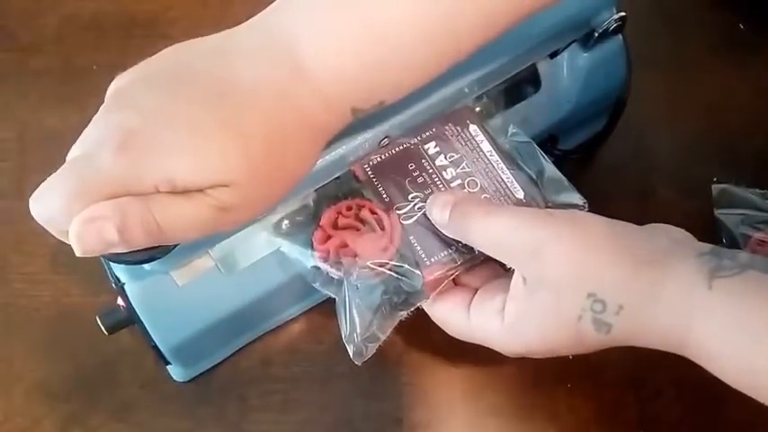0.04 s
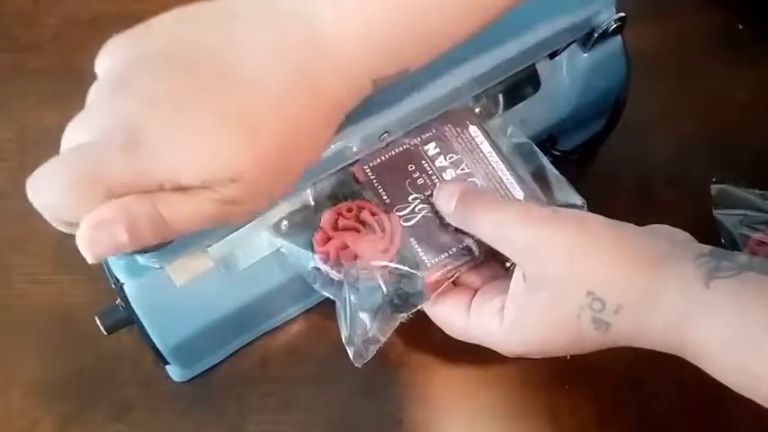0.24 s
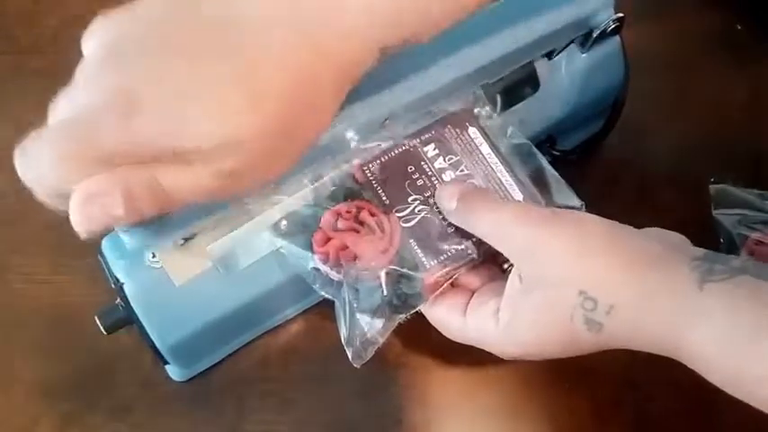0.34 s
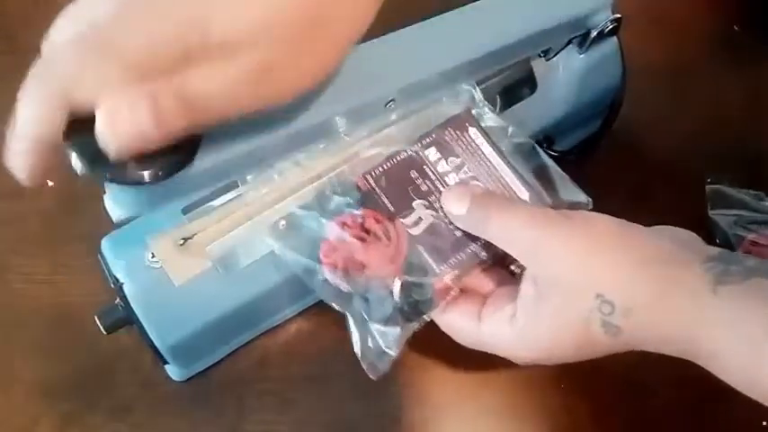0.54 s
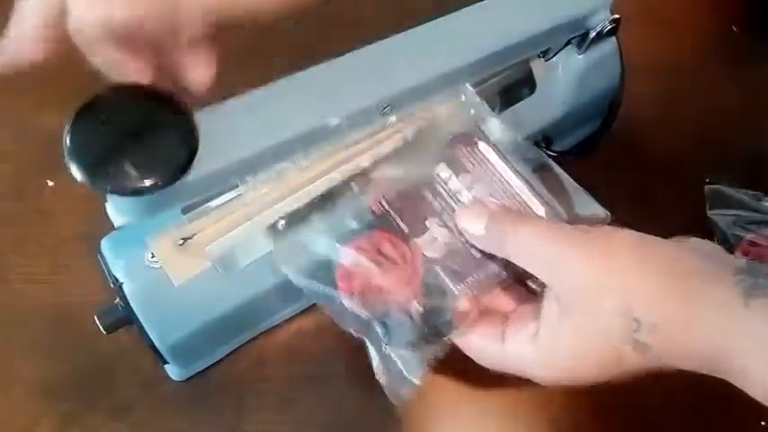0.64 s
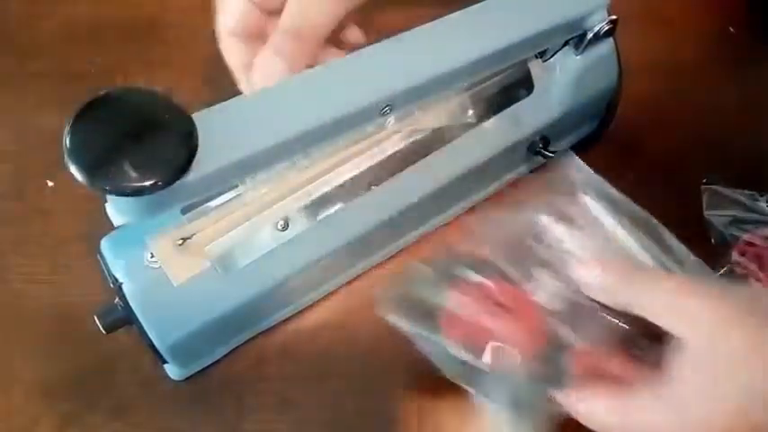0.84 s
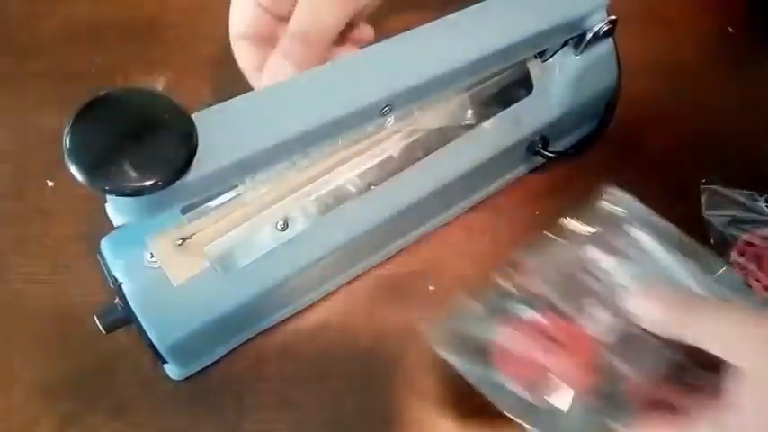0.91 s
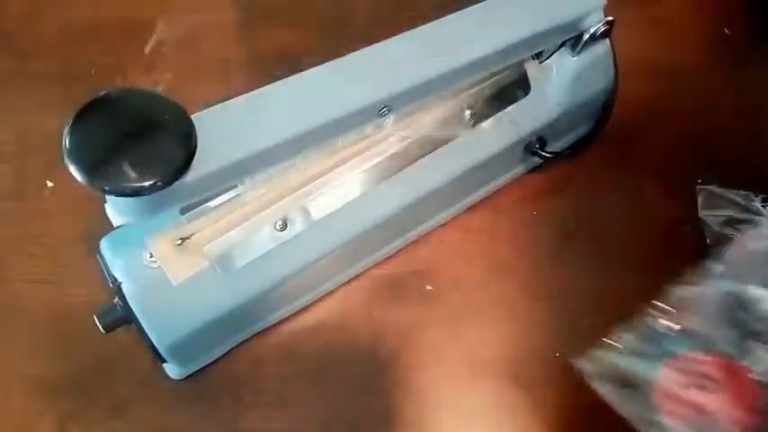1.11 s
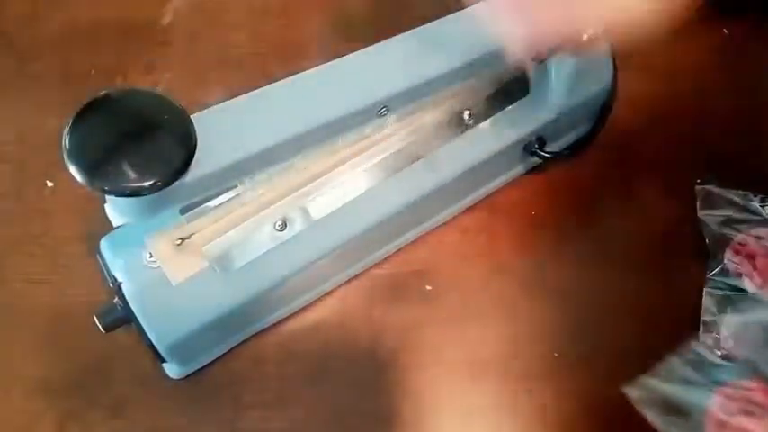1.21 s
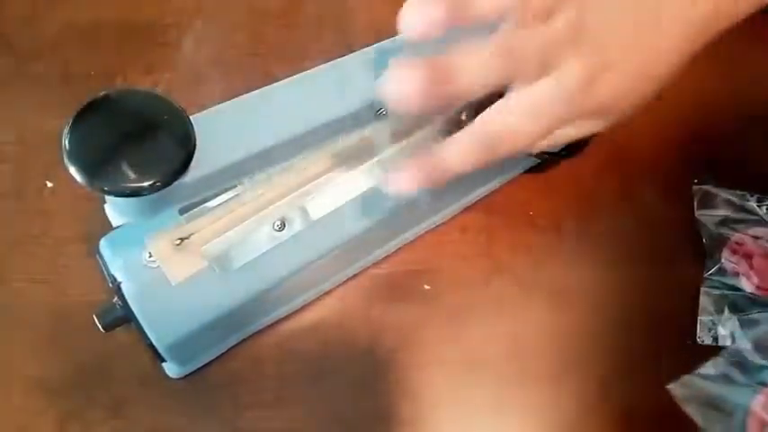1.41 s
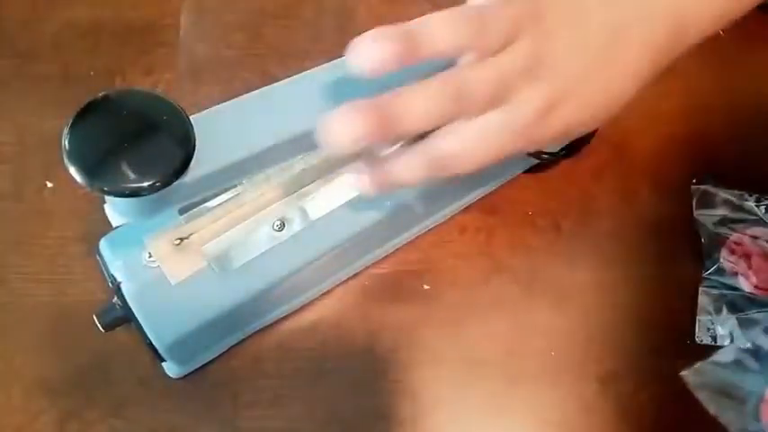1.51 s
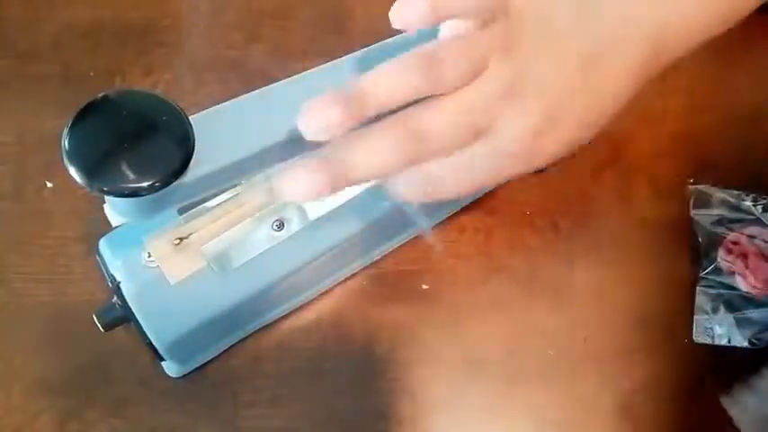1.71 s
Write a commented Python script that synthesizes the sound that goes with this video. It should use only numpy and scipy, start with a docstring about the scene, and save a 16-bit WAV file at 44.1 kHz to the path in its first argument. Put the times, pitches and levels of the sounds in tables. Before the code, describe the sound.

A bench bag sealer's arm springs up with knocks and rattles while a stiff plastic bag crackles.

```python
"""Bag sealer arm and crackling bag

A hand lets go of the arm of a bench bag sealer; the arm springs up, knocks and rattles on a wooden table,
as decaying modes driven by short blows and noise. The other hand pulls out a stiff plastic bag and lays it
aside: single folds are band-passed noise bursts, the fine crinkle is noise gated by random folds.
A small quiet room adds a diffuse tail and a low murmur; a phone close by hears it all."""
import sys
import numpy as np
from scipy import signal
from scipy.fft import rfft, irfft
from scipy.io import wavfile
from scipy.ndimage import uniform_filter1d

SR = 44100
rng = np.random.default_rng(int(sys.argv[2]) if len(sys.argv) > 2 else 0)


def digitize_waveform(pressure):
    """Quantize a signal to 16-bit integers and store it at the path in sys.argv[1].

    Rows of a 2-D input are taken as channels; values are limited to [-1, 1].
    """
    field = np.atleast_2d(pressure).T
    bounded = np.clip(field, -1, 1)
    quanta = np.round(bounded * 32767).astype(np.int16)
    wavfile.write(sys.argv[1], SR, quanta)


def nominal_scale(level):
    """Amplitude ratio for a level in decibels (scalar or array-like)."""
    x = np.asarray(level, float) / 20
    return 10 ** x


N = 77175
T = np.arange(N) / SR  # time in seconds

# Modes of the sealer and the table under it: pitch_hz, relative level_db, t60_s
BODY_MODES = [(138.5, -3, 0.1), (160.8, -4, 0.094), (213.2, -2.5, 0.12), (274, -10, 0.041),
              (296, -10.5, 0.061), (342, -6.5, 0.044), (431.2, 1.5, 0.054), (462.8, 3, 0.062),
              (534, -1.5, 0.043), (671, -5, 0.027), (1064, -16.5, 0.084), (1910, -19, 0.036),
              (2285, -12.5, 0.016), (5300, -17, 0.023), (614, -10.5, 0.05), (752.5, -4, 0.037),
              (987, -11, 0.082), (1203, -5, 0.045), (1341, -21, 0.29), (1427, -3, 0.021), (1724, -5, 0.024),
              (1855, -8, 0.046), (2093, -0.5, 0.025), (2414, -8.5, 0.056), (2797, -6, 0.03),
              (4110, -13.5, 0.033)]
# Centres of the six bands into which each blow is divided: centre_hz
STRIKE_HZ = [150, 450, 760, 1250, 2100, 4100]
# Knocks of the arm, and bumps of the bag on the sealer; the place struck decides what rings:
# start_s, chatter_length_s, then six relative level_db, one for each of STRIKE_HZ
KNOCKS = [(0.2447, 0.0011, -15, -23, -26, -27, -23.5, -64), (.275, 0.012, -36, -59, -39.5, -50, -43, -62),
          (.295, 0.007, -49, -40, -39, -43, -50, -65), (0.3146, 0.0048, -74, -34, -31, -48, -50, -20),
          (0.355, 0.026, -40, -43, -42, -45, -69, -28), (0.422, 0.0021, -52, -36.5, -48.5, -66, -69, -40),
          (0.427, 0.0066, -59, -38.5, -31, -41, -62, -41),
          (0.526, 0.0055, -30.5, -28, -31, -27.5, -37, -36.5), (.536, .012, -52, -25, -50, -31.5, -48, -50),
          (.572, 0.0055, -38, -47, -37.5, -35.5, -51, -61), (.682, 0.015, -33.5, -37, -34.5, -34, -40, -49),
          (.6962, 0.00091, -17.5, -26.5, -24.5, -24, -26.5, -21),
          (0.714, 0.0013, -66, -30.5, -30.5, -32.5, -39, -36), (0.746, 0.007, -27, -58, -66, -63, -45, -55),
          (0.767, 0.021, -28, -28.5, -36, -37, -60, -73),
          (0.785, 0.013, -27.5, -50, -29.5, -32, -40.5, -38), (0.797, 0.0078, -22, -23, -57, -41, -45, -36),
          (0.838, 0.0022, -34, -48, -73, -57, -53, -78), (0.9034, 0.0015, -44, -67, -53, -40, -40, -56),
          (0.191, 0.0018, -48, -49, -49, -41, -48, -32), (0.957, 0.0071, -64, -51, -66, -74, -75, -44),
          (1.255, 0.0018, -75, -53, -44, -81, -70, -40)]
# Rattle of the arm in its hinge: time_s, relative level_db
RATTLE = [(0.0, -78), (0.16, -39.5), (0.218, -37), (0.34, -23), (0.432, -44), (0.73, -27), (0.778, -71),
          (1.048, -43), (1.32, -59), (1.75, -52)]
# Slow heaves of the table top after the heaviest knocks: centre_s, pitch_hz, level_db, half_length_s
HEAVES = [(0.292, 63.7, -42, 0.017), (0.735, 61, -71, 0.037)]
# Spring and bar singing on after the stop: pitch_hz, level_db (before the gradual rise), t60_s
SPRING_MODES = [(245, -48, 2.2), (153, -55, 1.2), (345, -54, 1.1), (440, -48, 1.3), (614, -61, 1.5),
                (1525, -62, 1.6)]
# Loudest folds of the bag: start_s, relative peak_db, centre_hz, decay_s,
# bright_db (peak of the bright crackle against that of the pitched part)
SNAPS = [(0.087, -53, 1560, 0.0024, -8), (.1181, -38.5, 1830, 0.002, -12), (.127, -56, 5650, 0.0012, -7),
         (0.164, -37, 1510, 0.0015, -6), (0.179, -54, 7950, 0.0011, 14), (0.19, -37, 2140, 0.005, 4.5),
         (0.208, -56, 2060, 0.0015, -5), (0.245, -42.5, 9300, 0.0042, 7), (0.253, -52, 4570, 0.0036, 15),
         (0.274, -40, 4740, 0.0023, -4), (0.307, -55, 8000, 0.0015, 6), (0.3145, -38.5, 5300, 0.0088, 8),
         (0.338, -43, 7000, 0.0017, 5), (0.362, -44, 9100, 0.0026, 8), (0.368, -44, 7000, 0.0015, 7),
         (0.375, -35, 5700, 0.001, 3), (0.389, -30.5, 5060, 0.0016, 2), (0.397, -32, 5240, 0.00047, -11),
         (0.408, -40, 6800, 0.00097, 7), (0.423, -42, 11000, 0.0037, 1), (0.447, -45, 4460, 0.0023, -6),
         (0.484, -55.5, 9200, 0.0038, 17.5), (0.502, -46, 10000, 0.0027, 5), (0.507, -44, 5000, 0.0028, -6),
         (0.5514, -41.5, 4000, 0.0025, 1), (0.591, -39.5, 4070, 0.0066, -10),
         (.627, -37.5, 5300, 0.0034, 5.5), (0.652, -45, 4900, 0.0026, -20),
         (0.6795, -27.5, 4670, 0.0009, -9), (0.701, -26, 3640, 0.0011, -25),
         (0.706, -66, 9000, 0.0018, -12), (0.777, -45, 5400, 0.0027, -9), (0.804, -35.5, 5100, 0.0023, 4),
         (0.834, -41, 4450, 0.002, -11), (0.904, -33.5, 4700, 0.0021, 4), (0.957, -44.5, 3700, 0.002, 4),
         (1.03, -54, 3440, 0.0022, -21), (1.039, -62, 2920, .002, 22), (1.044, -44.5, 5600, 0.0012, 12),
         (1.06, -44, 5040, 0.00054, -2), (1.1102, -45, 5000, 0.0014, -1), (1.111, -53, 2570, 0.0016, -24),
         (1.1396, -58, 4300, 0.00085, 14), (1.155, -57, 2330, 0.0022, 3), (1.194, -48.5, 3744, 0.0016, -7),
         (1.254, -39, 1660, 0.0021, 5.5), (1.2878, -42.5, 3160, 0.0014, -2),
         (1.291, -52, 4730, 0.0027, -15), (1.6105, -59.5, 4830, 0.003, -3.5),
         (1.711, -54.5, 2080, 0.0034, 7), (1.721, -53, 8820, 0.0022, 2), (1.729, -58, 4400, 0.0068, 0)]
# Colour of the bright crackle of the film: frequency_hz, gain_db
FILM_COLOUR = [(500, -15), (1200, -21.5), (2500, 6), (5000, 3.5), (8000, -4), (12000, -4), (15500, -17)]
# Handling of the bag: time_s, relative level_db of the fine crinkle, tilt_db_per_octave
HANDLING = [(0, -93.5, -11), (.17, -68, -3), (.21, -52, -2), (.3, -55.5, 0.5), (.33, -40.5, -1.5),
            (.43, -47, -2), (.5, -56, -5), (.67, -54.5, -8), (.71, -56, -12.5), (.85, -59, -9),
            (1.06, -64.5, -2.5), (1.22, -75, -6.5), (1.25, -77, -4), (1.27, -60.5, -1.5), (1.4, -72, -4.5),
            (1.75, -86.5, -15.5)]
# Colour of the long tail from the walls: frequency_hz, gain_db
WALL_COLOUR = [(150, -16), (500, -2), (2000, 0), (5000, -6), (9000, -20)]
# Colour of the short bright tail from the furniture: frequency_hz, gain_db
FURNITURE_COLOUR = [(1500, -15), (5000, -4), (15000, -14)]
# Spectrum of the steady murmur: frequency_hz, relative density_db
AIR_SPECTRUM = [(18, -57), (30, 9.5), (189, 7.5), (252, 1), (295, 12), (449, -29), (512, 1.5), (1250, -14),
                (2680, -13.5), (2980, -40), (16000, -21)]
# Wavering low tones of the house: centre_hz, width_hz, early_db, late_db
HOUSE_TONES = [(96, 15, -69.5, -66), (363.7, 30, -68, -64), (448, 34, -93, -69)]

RATTLE_LOW_DB = -5.5  # the rattle drives the modes under 500 Hz less
SPRING_START_S, SPRING_RISE_S, SPRING_WAVER_DB = 0.797, 0.08, 3.5
DENSE_DB, DENSE_Q, DENSE_T60_S = -14, 5.5, 0.051
CRINKLES_PER_S, CRINKLE_SPREAD_DB = 640, 0.5
ROOM_DB, ROOM_T60_S, ROOM_TREBLE_T60_S = -12.5, 0.57, 0.25
AIR_DB, TONES_SWELL_S = -65.5, 1.4


def column(table, k):
    """Linear interpolation: column k of a curve at every instant."""
    return np.interp(T, [row[0] for row in table], [row[k] for row in table])


def colour(x, table):
    """Spectral shaping: gains in dB interpolated over log frequency."""
    f = np.arange(len(x) // 2 + 1) * SR / len(x)
    hz, db = np.array(table).T
    return irfft(rfft(x) * nominal_scale(np.interp(np.log(f + 1), np.log(hz), db)), len(x))


def unit(x):
    """Normalisation to an rms of 1."""
    return x / np.sqrt(np.mean(x ** 2))


def ring(x, hz, t60):
    """Damped resonance: a conjugate pole pair decays 60 dB in t60; zeros at 0 Hz quiet the far bass."""
    r = np.exp(-np.log(1000) / (t60 * SR))
    w = 2 * np.pi * hz / SR
    return signal.lfilter([.5, 0, -.5], [1, -2 * r * np.cos(w), r * r], x)


def band(x, hz, q):
    """Resonant selection: a two-pole band-pass."""
    return signal.lfilter(*signal.iirpeak(hz, q, SR), x)


def add(out, s, x):
    """Superposition: mixes x into out from s seconds on."""
    i = int(s * SR)
    out[i:i + len(x)] += x[:len(out) - i]


def knock_drive():
    """Impact excitation: a first blow and a short chatter of contacts, divided into six bands."""
    drive, t = np.zeros((6, N)), T[:2048]
    for start, length, *levels_db in KNOCKS:
        chatter = rng.standard_normal(2048) ** 3 * np.exp(-(t / length) ** 2)  # cubing makes it spiky
        chatter /= np.sqrt(np.sum(chatter ** 2))
        blow = 0.91 * (t == 0) + 0.59 * chatter
        for k in range(6):
            add(drive[k], start, nominal_scale(levels_db[k]) * blow)
    return np.array([band(row, hz, 1.0) for row, hz in zip(drive, STRIKE_HZ)])


def hinge_rattle():
    """Stochastic excitation: loose contacts in the hinge as noise of uneven height."""
    unevenness = nominal_scale(3.2 * rng.exponential(size=N).clip(max=2))
    return nominal_scale(column(RATTLE, 1) - 50.5) * rng.standard_normal(N) * unevenness


def body(drive, rattle):
    """Modal superposition: each mode answers to the blows near its pitch and to the rattle."""
    out = np.zeros(N)
    for k, (hz, db, t60) in enumerate(BODY_MODES):
        share = [np.interp(np.log(hz), np.log(STRIKE_HZ), row) for row in np.eye(6)]
        rattle_db = -1.5 * np.log2(hz / 400) + RATTLE_LOW_DB * (hz < 500)
        force = share @ drive + nominal_scale(rattle_db) * rattle
        out += (-1) ** k * nominal_scale(db) * ring(force, hz, t60)  # polarity alternates
    return out


def dense_modes(drive, rattle):
    """High modal density: crowds of small modes round the upper five bands act as decaying noise."""
    out, t = np.zeros(N), T[:SR // 4]
    for hz, blows in zip(STRIKE_HZ[1:], drive[1:]):
        noise = rng.standard_normal(len(t))
        crowd = unit(band(band(noise, hz, DENSE_Q), hz, DENSE_Q)) * nominal_scale(-60 * t / DENSE_T60_S)
        force = blows + nominal_scale(-30 + RATTLE_LOW_DB * (hz < 500)) * rattle
        out += nominal_scale(DENSE_DB) * signal.fftconvolve(force, crowd)[:N]
    return out


def table_heaves():
    """Low-frequency flexure: the table top moves as a sine under a Gaussian envelope."""
    out = np.zeros(N)
    for s, hz, db, length in HEAVES:
        out += nominal_scale(db) * np.exp(-((T - s) / length) ** 2) * np.sin(2 * np.pi * hz * (T - s))
    return out


def spring():
    """Free vibration: lightly damped modes of spring and bar rise gradually and waver in level."""
    out = np.zeros(N)
    rise = 1 - np.exp(-(T - SPRING_START_S).clip(0) / SPRING_RISE_S)
    impulse = 1. * (np.arange(N) == int(SPRING_START_S * SR))
    for hz, db, t60 in SPRING_MODES:
        noise = rng.standard_normal(N)
        waver = unit(uniform_filter1d(uniform_filter1d(noise, size=1500), size=1500))
        out += nominal_scale(db + SPRING_WAVER_DB * waver) * rise * ring(impulse, hz, t60)
    return out


def sealer():
    """Source and resonator: knocks and rattle drive the modes; heaves and spring are added."""
    drive, rattle = knock_drive(), hinge_rattle()
    return body(drive, rattle) + dense_modes(drive, rattle) + table_heaves() + spring()


def bag_snaps():
    """Sudden buckling: a big fold gives a short noise burst, partly round a pitch and partly bright."""
    out, t = np.zeros(N), T[:1024]
    for start, db, hz, length, bright_db in SNAPS:
        burst = rng.standard_normal(1024) * np.exp(-t / length) * np.minimum(t / 0.00051, 1)
        tone = band(band(burst, hz, 3.65), hz, 1.0)
        bright = colour(burst, FILM_COLOUR)
        snap = tone / np.abs(tone).max() + nominal_scale(bright_db) * bright / np.abs(bright).max()
        add(out, start, nominal_scale(db - 0.5) * snap)
    return out


def bag_crinkle():
    """Crackling noise: random tiny folds tick in half-octave bands, with steady noise between them."""
    out = np.zeros(N)
    heights = nominal_scale(CRINKLE_SPREAD_DB * rng.exponential(size=N).clip(max=3))
    folds = (rng.random(N) < CRINKLES_PER_S / SR) * heights
    for octave in np.arange(-2, 2.1, .5):  # octaves from 3600 Hz
        ticks = folds * nominal_scale(6.2 * rng.standard_normal(N).clip(max=2))
        envelope = signal.lfilter([1], [1, -np.exp(-1 / (.0006 * SR))], ticks)  # time constant 0.6 ms
        crackle = unit(envelope * rng.standard_normal(N))
        steady = nominal_scale(-4.5 - 2.6 * octave) * rng.standard_normal(N)
        grain = unit(band(crackle + steady, 3600 * 2 ** octave, 3.96))
        level_db = column(HANDLING, 1) + column(HANDLING, 2) * octave - 2.32 * octave ** 2 - 8.0
        out += nominal_scale(level_db) * grain
    return out


def bag():
    """Superposition of buckling events: large snaps over fine crinkle."""
    return bag_snaps() + bag_crinkle()


def room(x):
    """Diffuse reverberation: convolution with decaying noise whose bright part dies sooner."""
    t = T[:SR // 2]
    long = rng.standard_normal(len(t)) * nominal_scale(-60 * t / ROOM_T60_S)
    short = rng.standard_normal(len(t)) * nominal_scale(-60 * t / ROOM_TREBLE_T60_S)
    tail = colour(long, WALL_COLOUR) + colour(short, FURNITURE_COLOUR)
    tail *= np.minimum(t / .008, 1)  # builds up over 8 ms
    return nominal_scale(ROOM_DB) * signal.fftconvolve(x, tail / np.sqrt(np.sum(tail ** 2)))[:N]


def air():
    """Stationary noise: a barely wavering murmur of the house, with narrow low bands that step up late."""
    waver = unit(uniform_filter1d(rng.standard_normal(N), size=4000))
    out = nominal_scale(AIR_DB + 0.23 * waver) * unit(colour(rng.standard_normal(N), AIR_SPECTRUM))
    for hz, width, early, late in HOUSE_TONES:
        db = np.interp(T, [TONES_SWELL_S - .05, TONES_SWELL_S], [early, late])
        out += nominal_scale(db) * unit(band(rng.standard_normal(N), hz, hz / width))
    return out


def scene():
    """Direct and reverberant sound: sealer and bag, their room tail and the murmur, on one channel."""
    arm, film = sealer(), bag()
    return (arm + film + room(arm + film) + air())[None]


def roll_off(x):
    """The treble ends steeply here."""
    return signal.sosfilt(signal.butter(12, 16480, fs=SR, output="sos"), x)


def record(dry):
    """Band limitation: filters remove the deepest bass and the top above about 16 kHz."""
    bass_cut = signal.butter(3, 60, "high", fs=SR, output="sos")
    top_cut = signal.ellip(8, .3, 60, 15900, fs=SR, output="sos")
    mix = signal.sosfilt(top_cut, signal.sosfilt(bass_cut, dry))
    return roll_off(mix)


dry = scene()
out = record(dry)
digitize_waveform(out)
```